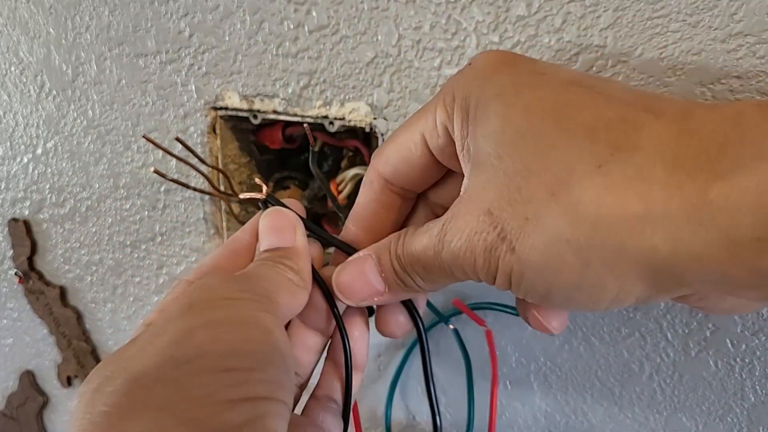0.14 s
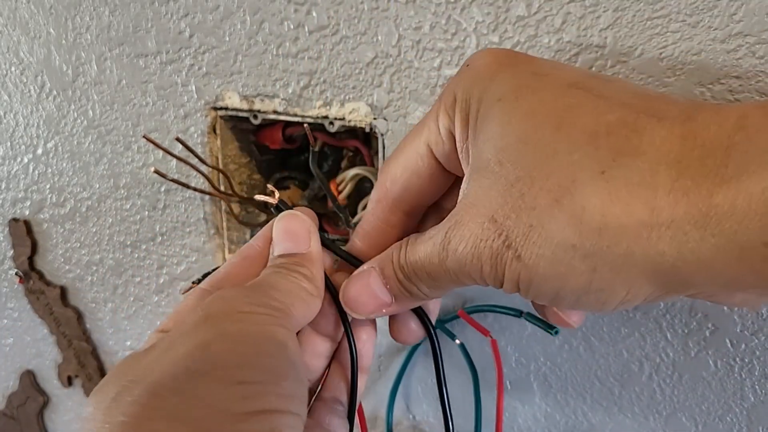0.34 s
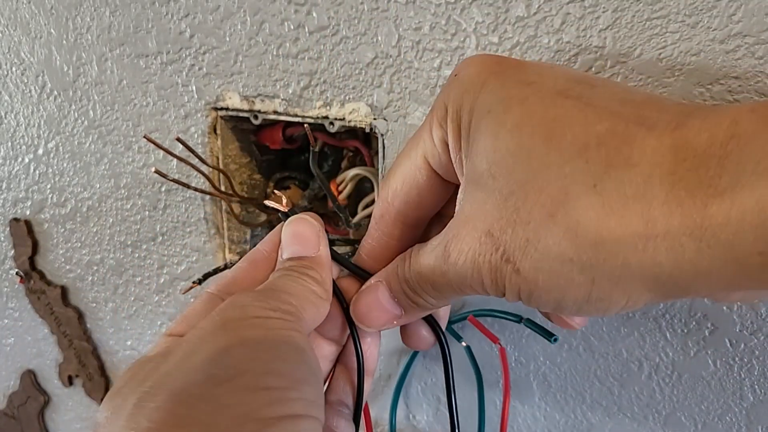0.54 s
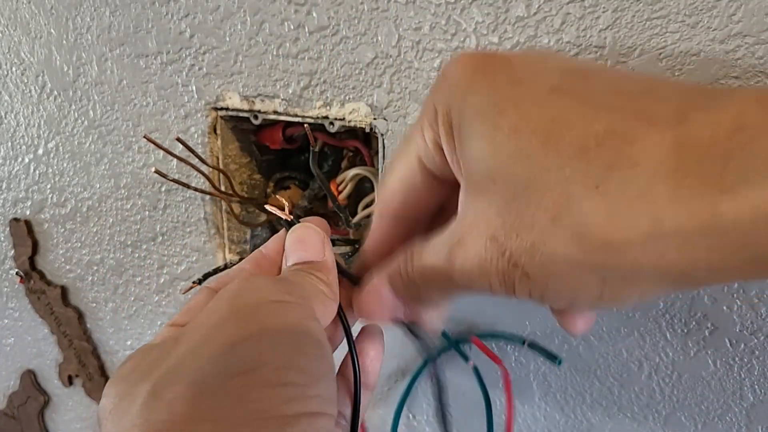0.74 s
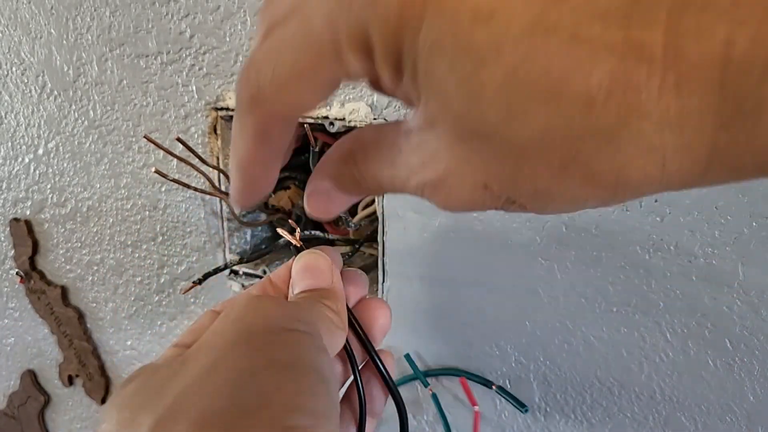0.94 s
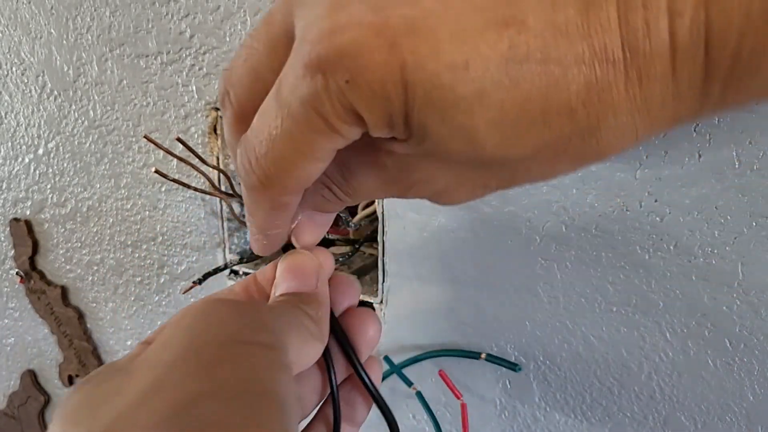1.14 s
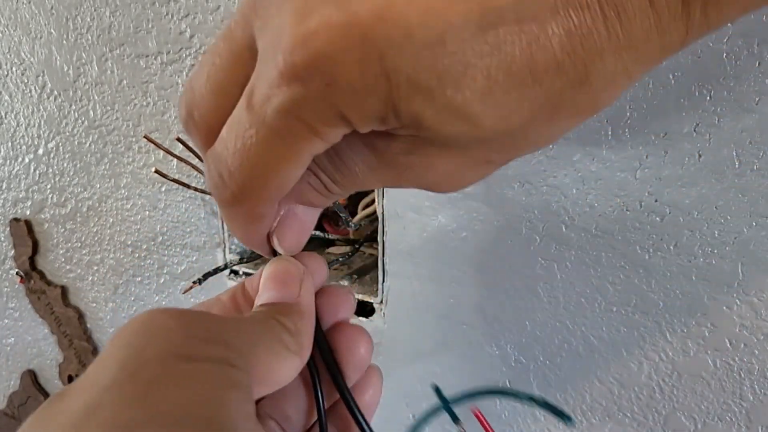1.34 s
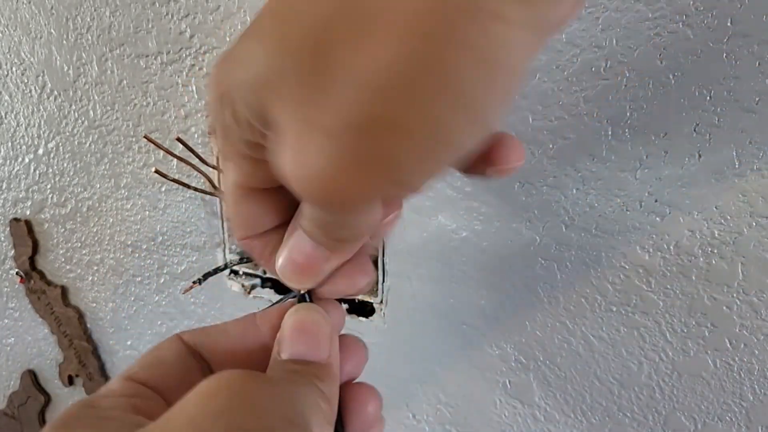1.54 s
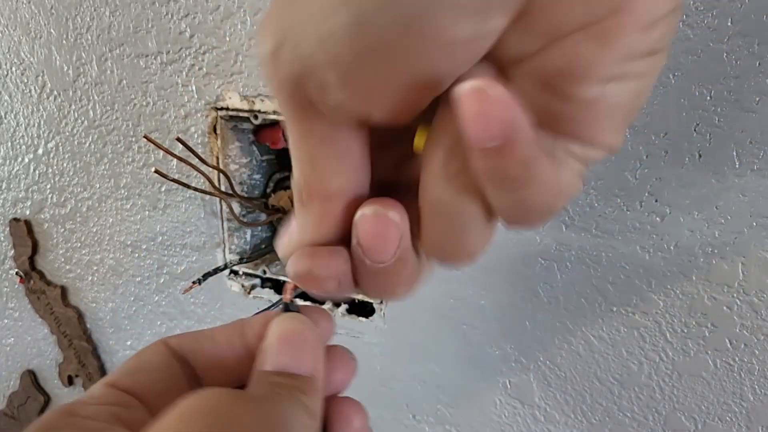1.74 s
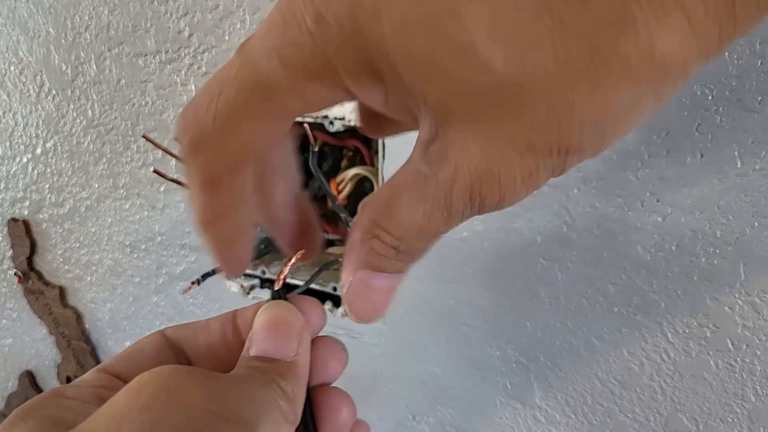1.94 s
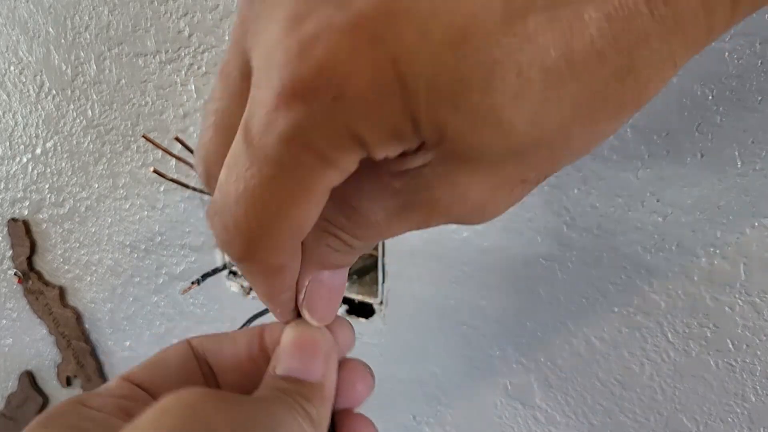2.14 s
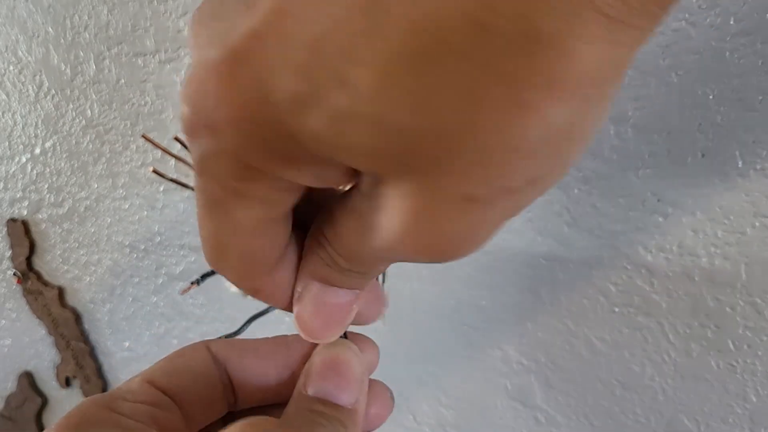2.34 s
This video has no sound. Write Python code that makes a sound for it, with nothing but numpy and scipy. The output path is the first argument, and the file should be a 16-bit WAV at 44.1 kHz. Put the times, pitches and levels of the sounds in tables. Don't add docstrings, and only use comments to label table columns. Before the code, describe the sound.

Copper wires handled close up at a metal wall box. A dull hollow thud with a metallic tick lands at 0.23 s, softer bumps follow, then thuds, short bright rings and rattle crowd 0.73-1.05 s, strongest near 0.95. Afterwards it is quiet: faint insulation slides, small clicks around 1.5-1.6, 1.8 and 2.1 s. Low mains hum, faint hollow hiss, short room echo.

```python
import sys
import numpy as np
from scipy import signal
from scipy.fft import rfft, irfft, next_fast_len
from scipy.io import wavfile
from scipy.ndimage import uniform_filter1d

SR = 44100
rng = np.random.default_rng(int(sys.argv[2]) if len(sys.argv) > 2 else 0)


def to_wav(s):
    ch = np.atleast_2d(s).T
    pcm = np.round(np.clip(ch, -1, 1) * 32767)
    wavfile.write(sys.argv[1], SR, pcm.astype(np.int16))


def ratio(d):
    e = np.asarray(d, float) / 20
    return 10 ** e


N = 105840

# (pitch [Hz], level [dB], time to fade by 60 dB [s])
BOX = [(1156, -2.5, 0.086), (1483, 7, 0.032), (1751, 5.5, 0.036), (1895, -2.5, 0.054), (2204, -2.5, 0.071),
       (2580, 2, 0.02), (2900, -2.5, 0.062), (3085, -2.5, 0.015), (5490, -22, 0.19), (5600, -25.5, 0.29),
       (5523, -21.5, .1), (5600, -8.5, 0.067), (5960, -17, 0.067)]
# (frequency [Hz], level [dB])
CRACK = [(400, -12), (1000, -33), (3000, 13), (5000, 1.5), (7400, 7), (9000, -32), (11000, -3),
         (15800, -12)]


def unit(x):
    return x / np.sqrt(np.mean(x ** 2) + 1e-20)


def peak(x):
    return x / np.abs(x).max()


def along(points, hz):
    f, v = np.transpose(points)
    return np.interp(np.log(hz + 1), np.log(f + 1), v)


def filtered(x, response):
    n = x.shape[-1]
    m = next_fast_len(n + SR // 4)
    return irfft(rfft(x, m) * response(np.fft.rfftfreq(m, 1 / SR)), m)[..., :n]


def ring(modes, t, scatter_db):
    hz, db, t60 = np.transpose(modes)[:, :, None]
    strength_db = db + scatter_db * rng.standard_normal(hz.shape)
    return (ratio(strength_db - 60 * t / t60) * np.sin(2 * np.pi * hz * t)).sum(axis=0)


def add(track, s, sound):
    part = track[..., max(round(s * SR), 0):][..., :sound.shape[-1]]
    part += sound[..., :part.shape[-1]]


def room(x):
    # (frequency [Hz], time to fade by 60 dB [s])
    fading = [(150, 0.68), (1500, 0.42), (5000, 0.31), (12000, 0.27)]
    hz, t, z = signal.stft(rng.standard_normal((2, SR // 3)), SR, nperseg=256)
    tail = signal.istft(z * ratio(-60 * t / along(fading, hz)[:, None]), SR, nperseg=256)[1]
    return signal.fftconvolve(np.pad(x, (200, 0))[None], tail / np.linalg.norm(tail[0]), axes=1)


def arrive(x):
    # (frequency [Hz], how far the left is ahead [radians])
    left_lead = [(300, 0.004), (1100, 1.42), (1720, 1.89), (2240, -2.05), (3000, 1.3), (5500, 1.5),
                 (15000, 2.34)]
    lag_s, lean_db, room_db = .003, -1.2, -12
    out = ratio(room_db) * room(x)

    def turn(hz):
        return np.exp(np.outer([.5j, -.5j], along(left_lead, hz)) - 2j * np.pi * hz * lag_s)

    direct = filtered(np.array([x, x]), turn)[:, round(lag_s * SR):]
    add(out, 0, ratio([[lean_db], [-lean_db]]) * direct)
    return out


def air():
    # (frequency [Hz], level [dB per Hz])
    rumble = [(21, -39), (35, 1.5), (59, -7), (144, -15), (168, -11.5), (349, -13.5), (391, -18.5),
              (1000, -26), (1300, -72), (2200, -120)]
    # (frequency [Hz], level [dB per Hz])
    hiss = [(590, -45), (1000, -11), (1550, -4), (1680, -22), (2270, -8.5), (3910, -21.5), (7040, -22.5),
            (8570, -36.5), (15800, -28.5)]
    # (centre [Hz], width [Hz], level [dB])
    narrow_hum = [(200.2, 44, -65.5)]
    # (frequency [Hz], likeness of left and right [-1 to 1])
    alike = [(60, 0.94), (180, 0.99), (550, -0.41), (1650, -0.39), (4970, -0.36), (15000, 0.36)]

    def spread_noise(gain):
        def response(hz):
            angle = np.arccos(np.clip(along(alike, hz), -1, 1)) / 2
            return gain(hz) * np.array([np.cos(angle), np.sin(angle)])

        mid, side = filtered(rng.standard_normal((2, N)), response)
        return unit(np.array([mid + side, mid - side]))

    out = ratio(-58.5) * spread_noise(lambda hz: ratio(along(rumble, hz)) * np.clip(hz / 44, 0, 1) ** 10)
    out = out + ratio(-75) * spread_noise(lambda hz: ratio(along(hiss, hz)))
    for centre_hz, width_hz, db in narrow_hum:
        band = spread_noise(lambda hz: np.exp(-.5 * ((hz - centre_hz) / (width_hz / 2)) ** 2))
        out = out + ratio(db) * band
    return out


def hum():
    mains_hz, level_db, wander = 49.5, -61.5, .2
    sway = wander * unit(filtered(rng.standard_normal((2, N)), lambda hz: hz < 6))
    tone = np.sin(2 * np.pi * mains_hz * np.arange(N) / SR + sway[1])
    return ratio(level_db) * (1 + sway[0]) * tone * np.sqrt(2)


def rattle():
    # (time [s], level [dB])
    handling = [(0, -67.5), (.2, -71.5), (0.269, -71.5), (.5, -75), (0.651, -85.5), (0.741, -65),
                (0.849, -60.5), (0.918, -67.5), (0.968, -47.5), (1.048, -62), (1.15, -71.5), (1.299, -81.5),
                (1.721, -77), (1.85, -87), (2, -83), (2.4, -80.5)]
    hits_per_s, spread_db, crack_db = 1500, 3.5, -9
    t = np.arange(SR // 6) / SR
    chance, sign, size = rng.random(N), rng.standard_normal(N), rng.exponential(size=N)
    hits = unit((chance < hits_per_s / SR) * sign * ratio(spread_db * np.minimum(size, 3)))
    hits = hits * ratio(np.interp(np.arange(N) / SR, *np.transpose(handling)))
    body = ring(BOX, t, 0)
    body = body / np.linalg.norm(body)
    crack = filtered(np.eye(1, 512, 256)[0], lambda hz: ratio(along(CRACK, hz)))
    add(body, 0, ratio(crack_db) * crack / np.linalg.norm(crack))
    return arrive(signal.fftconvolve(hits, body))[:, :N]


def thuds():
    # (time [s], peak level [dB])
    bumps = [(.012, -44.5), (0.233, -20.5), (0.246, -63), (0.267, -31), (0.301, -34.5), (0.357, -38.5),
             (.385, -39.5), (.412, -39.5), (0.453, -37.5), (.495, -40), (.565, -40.5), (0.681, -36.5),
             (.728, -35.5), (0.746, -33.5), (0.775, -36), (0.79, -34.5), (0.806, -28.5), (0.825, -39),
             (0.84, -30.5), (0.852, -39.5), (0.876, -39), (0.953, -26), (0.958, -33.5), (0.966, -35.5),
             (0.987, -39.5), (1.02, -36), (1.051, -40.5), (1.09, -45.5), (1.588, -53.5), (2.15, -51),
             (2.199, -50), (2.248, -53.5)]
    # (pitch [Hz], level [dB], time to fade by 60 dB [s])
    panel = [(88.3, -9.5, 0.46), (116.9, -2.5, 0.2), (159.8, 4.5, 0.1), (213.2, 2.5, 0.066), (301, -7, 0.1),
             (363.7, -4, 0.042)]
    # (pitch [Hz], level [dB], time to fade by 60 dB [s])
    rocking = [(92, -8, .2), (108, -15, .15), (320, -13, .1)]
    bump_s, lean_db, room_db = 0.00084, -1.5, -19
    shove, shove_late_s = 0.26, 0.00029
    out, t = np.zeros((2, N)), np.arange(SR // 3) / SR

    def bell(late):
        return np.exp(-.5 * ((t[:SR // 50] - late) / bump_s - 3) ** 2)

    push = peak(np.gradient(bell(0))) - shove * bell(shove_late_s)
    for s, db in bumps:
        mid = signal.fftconvolve(push, -ring(panel, t, scatter_db=2))
        side = signal.fftconvolve(push, -ring(rocking, t, scatter_db=2))
        gain = ratio(db) / np.abs(mid).max()
        pair = np.array([ratio(lean_db) * (mid + side), ratio(-lean_db) * (mid - side)])
        add(out, s - 3 * bump_s, gain * pair)
        add(out, s, ratio(room_db) * gain * room(mid))
    return out


def wire_contact(db, first_hz, second_hz, chatter_s, note_t60, box_db):
    contact_s, second_db, crack_db = 0.00051, -2, -4
    t = np.arange(SR // 6) / SR
    spikes = rng.standard_normal(len(t)) * ratio(3.8 * rng.standard_normal(len(t)))
    hits = spikes * np.exp(-t / chatter_s) * (1 - np.exp(-t / contact_s))

    def rung(modes, scatter_db):
        return peak(signal.fftconvolve(hits, ring(modes, t, scatter_db))[:len(t)])

    def note(hz):
        weaker_highs = ratio(-1.5 * np.log2(hz / 2000))
        return weaker_highs * rung([(hz, 0, note_t60)], 0)

    notes = note(first_hz) + ratio(second_db) * note(second_hz)
    crack = peak(filtered(hits, lambda hz: ratio(along(CRACK, hz))))
    mixed = notes + ratio(box_db) * rung(BOX, 2.5) + ratio(crack_db) * crack
    return arrive(ratio(db) * peak(mixed))


def ticks():
    # (time [s], peak level [dB], first note [Hz], second note [Hz], chatter [s])
    touches = [(0.087, -44, 2965, 3090, 0.0045), (0.12, -49.5, 3030, 2900, .002),
               (.13, -54, 1830, 2970, .005), (.231, -38.5, 2900, 1810, 0.001),
               (0.234, -34, 1118, 1750, 0.0013), (.246, -45.5, 1185, 1150, 0.0015),
               (0.45, -61, 2900, 5490, 0.0024), (0.467, -57, 1190, 2900, 0.006),
               (0.548, -57.5, 2990, 1960, 0.0035), (0.556, -58, 5600, 3040, 0.0028),
               (0.679, -67, 2900, 1050, 0.0017), (0.725, -47, 3005, 5560, 0.0027),
               (0.744, -48, 1185, 2920, 0.0033), (0.761, -54, 2900, 5400, 0.0022),
               (0.787, -43, 2900, 5360, 0.0035), (.803, -41, 3020, 5500, 0.0024),
               (.808, -44, 1196, 1790, 0.014), (.824, -48, 2000, 3020, .003),
               (.835, -48, 2900, 1980, 0.0017), (0.877, -46.5, 2010, 3100, 0.0045),
               (0.902, -60, 1990, 2900, 0.0033), (0.932, -39, 1500, 1870, 0.013),
               (0.942, -40.5, 1770, 2810, 0.009), (0.949, -31, 2286, 2900, 0.0051),
               (0.955, -30, 5400, 5523, 0.001), (.958, -31.5, 5600, 5420, 0.0011),
               (0.969, -30, 5520, 5440, 0.00099), (0.982, -35.5, 5600, 1840, 0.0015),
               (0.989, -33, 5640, 5410, .0015), (1.001, -48, 5440, 5362, .002),
               (1.018, -37, 1910, 1580, 0.0054), (1.022, -44, 2290, 2570, 0.0053), ]
    out = np.zeros((2, N))
    for s, db, first_hz, second_hz, chatter_s in touches:
        add(out, s, wire_contact(db, first_hz, second_hz, chatter_s, note_t60=.024, box_db=-7))
    return out


def snaps():
    # (time [s], peak level [dB], length [s], brightest frequency [Hz])
    jumps = [(0.087, -55, 0.0043, 5660), (0.119, -53.5, 0.004, 5700), (.229, -44, 0.0019, 7060),
             (0.232, -43.5, 0.0056, 5100), (0.24, -49, 0.0019, 6350), (.383, -68, 0.0013, 4270),
             (0.546, -61, 0.0035, 5560), (0.552, -65, 0.0045, 5360), (.618, -70, .002, 4000),
             (.676, -62.5, 0.0025, 1500), (0.729, -47, 0.0023, 6330), (0.787, -47, 0.0039, 6170),
             (0.789, -42, 0.0028, 6000), (0.8, -52.5, 0.0018, 6030), (0.876, -60, 0.0019, 5900),
             (0.929, -44, 0.0044, 3430), (0.947, -56, .003, 7950), (0.952, -31.5, 0.0021, 2960),
             (.952, -40.5, 0.0037, 11000), (.968, -41, .002, 9000), (1.5, -60.5, 0.0013, 4200),
             (1.509, -64, 0.0022, 12000), (1.569, -66, 0.0018, 11000), (1.593, -68, .001, 9000),
             (1.787, -51, .003, 7300), (1.794, -56, 0.0023, 6500), (1.799, -58, 0.0028, 7050),
             (1.821, -69, 0.0024, 4000)]
    octaves, rise, box_top_hz = 0.62, 0.35, 8200
    out, t = np.zeros((2, N)), np.arange(SR // 20) / SR
    for s, db, length, bright_hz in jumps:
        swell = np.exp(-t / length) * (1 - np.exp(-t / (rise * length)))
        burst = rng.standard_normal(len(t)) * swell
        top_hz = max(box_top_hz, 1.7 * bright_hz - 3000)

        def band(hz):
            bright = np.exp(-.5 * (np.log2((hz + 1) / bright_hz) / octaves) ** 2)
            return bright / (1 + (hz / top_hz) ** 10)

        add(out, s, arrive(ratio(db) * peak(filtered(burst, band))))
    return out


def slides():
    # (start [s], length [s], level [dB], dullness [0-1])
    strokes = [(0.784, 0.053, -71, 0.25), (0.932, 0.059, -52, 0.23), (0.946, 0.12, -84, 0.2),
               (0.961, 0.09, -63.5, 0.28), (1.156, 0.091, -71.5, 0), (1.472, 0.16, -77, 0.21),
               (1.492, 0.01, -73.5, 0), (1.576, 0.007, -67, 0.13), (1.606, 0.058, -74.5, 0.17),
               (1.751, 0.073, -67, 0.24), (1.785, 0.021, -60, 0.06), (1.799, 0.064, -69.5, 0.2),
               (2.085, 0.074, -73.5, 0.33), (2.218, 0.058, -81.5, 0.1)]
    # (frequency [Hz], level [dB])
    bright_skin = [(1000, -9.5), (3000, -2.5), (7000, 0), (12000, -1.5), (15800, 0)]
    # (frequency [Hz], level [dB])
    dull_skin = [(1000, 41), (2500, 9), (5500, -21), (7500, -3.5), (9000, -59), (15800, -32)]
    rise, grit_db, room_db = .5, 3.5, -10
    out = np.zeros((2, N))
    for s, length, db, dull in strokes:
        u = np.linspace(0, 1, round(length * SR))
        swell = np.sin(np.pi / 2 * np.minimum(u / rise, (1 - u) / (1 - rise))) ** 2
        slips = ratio(grit_db * unit(uniform_filter1d(rng.standard_normal(len(u)), size=60)))

        def colour(hz):
            level_db = dull * along(dull_skin, hz) + (1.5 - dull) * along(bright_skin, hz)
            return ratio(level_db) * np.clip(hz / 1000, 0, 1) ** 2

        noise = unit(filtered(slips * rng.standard_normal((2, len(u))), colour))
        mid, side = ratio(db) * swell * noise
        add(out, s, np.array([mid + 1.42 * side, mid - 0.98 * side]))
        add(out, s, ratio(room_db) * room(mid))
    return out


def clicks():
    # (time [s], peak level [dB], first note [Hz], second note [Hz], chatter [s])
    twists = [
        (1.543, -46, 3060, 2140, 0.0029),
        (1.617, -61.5, 6460, 7640, .006),
        (1.629, -58.5, 7250, 6570, .006),
        (1.73, -66.5, 2750, 2670, 0.05),
        (1.791, -52.5, 1870, 2810, 0.01),
        (1.827, -60, 2110, 4070, .004),
        (1.838, -58.5, 2070, 2030, 0.0076),
        (2.089, -64.5, 2030, 3090, 0.0019),
        (2.125, -62, 4810, 4670, 0.0019),
    ]
    out = np.zeros((2, N))
    for s, db, first_hz, second_hz, chatter_s in twists:
        add(out, s, wire_contact(db, first_hz, second_hz, chatter_s, note_t60=.015, box_db=-20))
    return out


def scene():
    return air() + hum() + rattle() + thuds() + ticks() + snaps() + slides() + clicks()


def roll_off(x):
    return signal.sosfilt(signal.butter(12, 16220, fs=SR, output="sos"), x)


def record(dry):
    low_cut_hz, top_hz = 43, 15850

    def limits(hz):
        return (hz < top_hz) * (1j * hz / (low_cut_hz / 2 + 1j * hz)) ** 2

    return roll_off(filtered(dry, limits))


dry = scene()
out = record(dry)
to_wav(out)
```